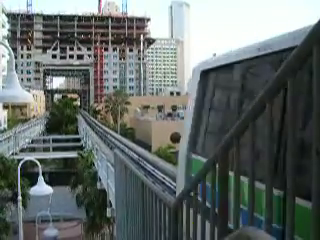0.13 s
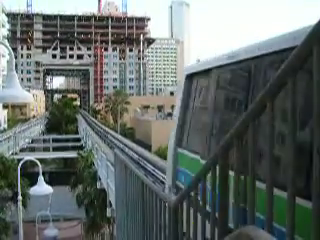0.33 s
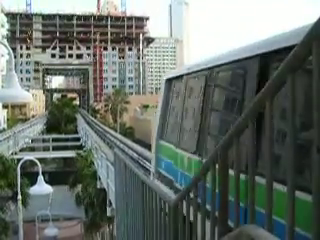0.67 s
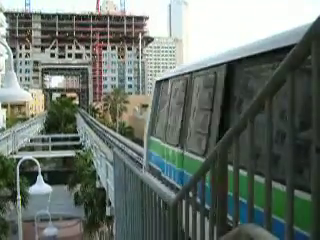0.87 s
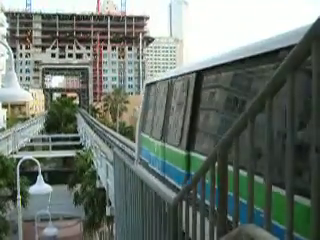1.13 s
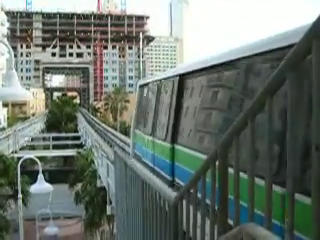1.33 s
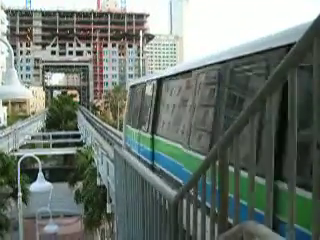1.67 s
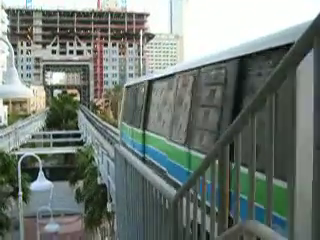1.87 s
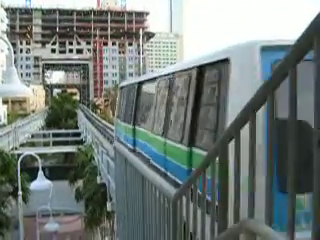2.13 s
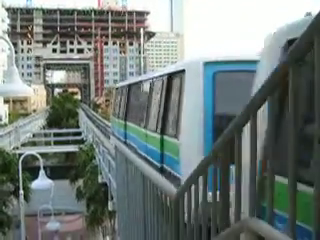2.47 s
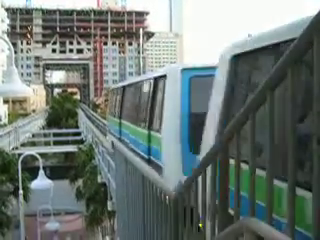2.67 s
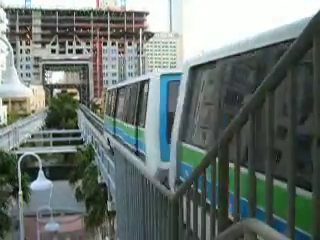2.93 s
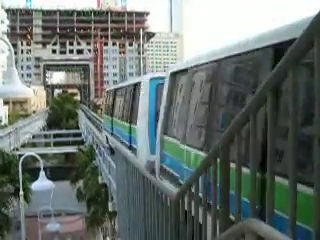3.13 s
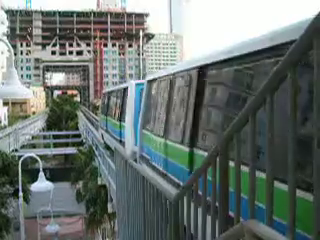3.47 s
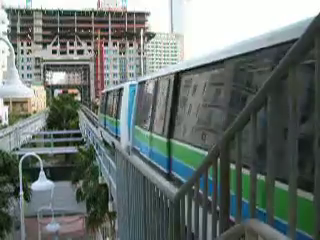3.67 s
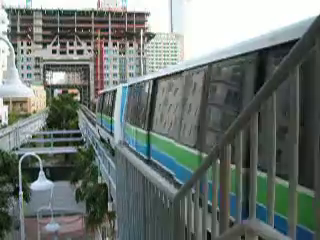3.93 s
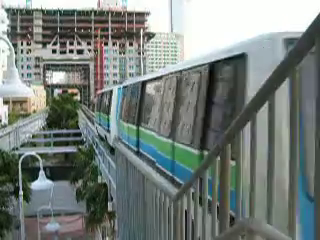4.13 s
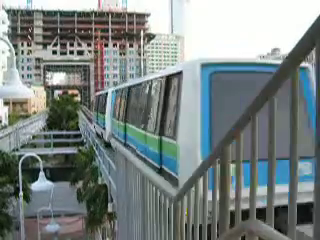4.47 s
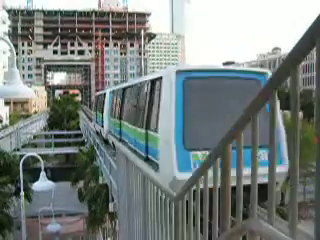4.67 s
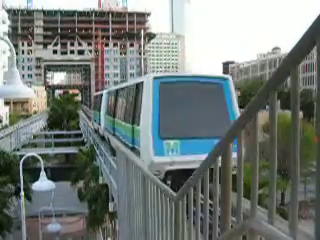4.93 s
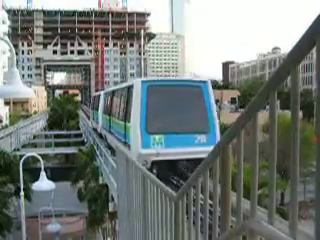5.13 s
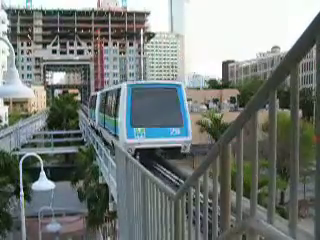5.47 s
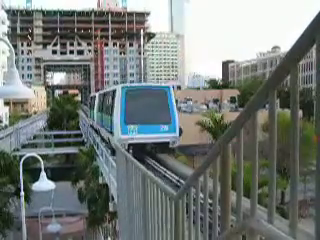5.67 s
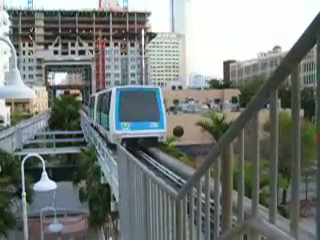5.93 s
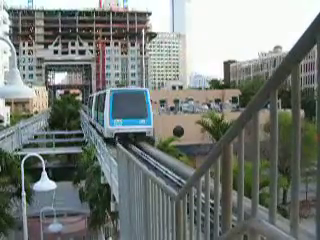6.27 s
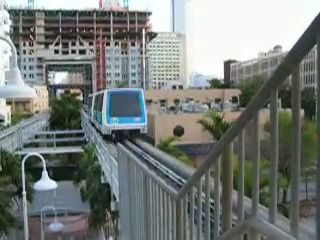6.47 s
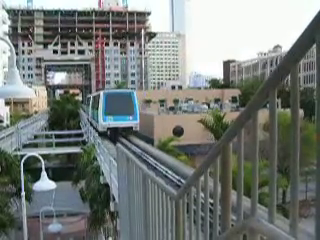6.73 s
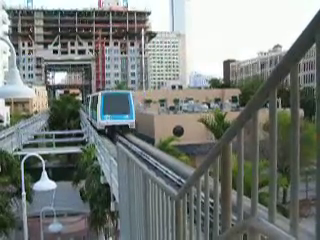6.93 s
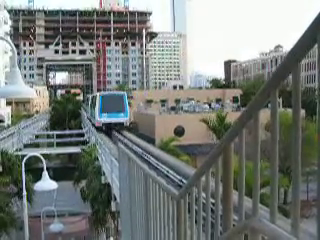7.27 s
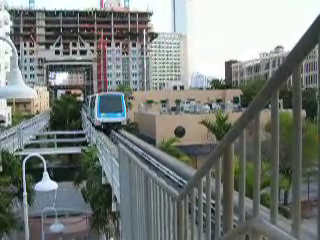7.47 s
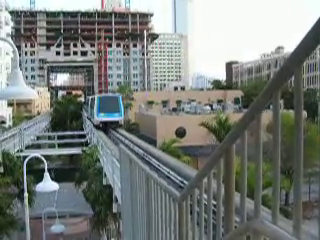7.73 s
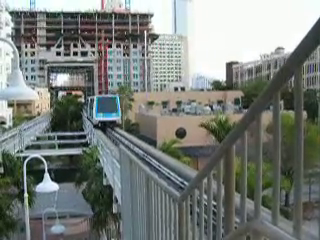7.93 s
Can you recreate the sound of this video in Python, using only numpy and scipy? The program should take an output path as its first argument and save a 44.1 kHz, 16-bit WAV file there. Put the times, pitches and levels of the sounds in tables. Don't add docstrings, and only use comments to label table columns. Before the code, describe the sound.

An elevated rubber-tyred train rumbles and roars past close by, metal shoes clanking on rail joints, caught by a small, overloaded, muffled microphone.

```python
import sys
import numpy as np
from scipy import signal
from scipy.fft import rfft, irfft
from scipy.io import wavfile
from scipy.ndimage import uniform_filter1d

SR = 44100
rng = np.random.default_rng(int(sys.argv[2]) if len(sys.argv) > 2 else 0)


def file_out(sig):
    cols = np.atleast_2d(sig).T
    lim = np.clip(cols, -1, 1)
    pcm = np.round(lim * 32767).astype(np.int16)
    wavfile.write(sys.argv[1], SR, pcm)


def ratio(d):
    e = np.asarray(d, float) / 20
    return 10 ** e


N = 357342
CEILING = .712


def evened(x):
    return x / np.sqrt(np.mean(x ** 2) + 1e-20)


def read(points, hz):
    f, value = np.transpose(points)
    return np.interp(np.log(hz + 1), np.log(f + 1), value, left=-100, right=-100)


def columns(rows):
    s, *values = np.transpose(rows)
    t = np.arange(N) / SR
    fade_s = .02
    gate = np.clip(np.minimum(t - s[0] + fade_s, s[-1] + fade_s - t) / fade_s, 0, 1)
    return gate, [np.interp(t, s, v) for v in values]


def drift(hz):
    z = rfft(rng.standard_normal(N))
    return evened(irfft(z / (1 + (np.fft.rfftfreq(N, 1 / SR) / hz) ** 2), N))


def noise(spectrum, patchy_db, flicker_db):
    frames, hz = N // 256 + 5, np.fft.rfftfreq(1024, 1 / SR)
    a, b, patches = rng.standard_normal((frames, 513, 3)).T
    patches = uniform_filter1d(patches, size=6, axis=0)
    patches = evened(uniform_filter1d(patches, size=14, axis=1))
    flicker = evened(uniform_filter1d(rng.standard_normal(frames), size=5))
    gain_db = read(spectrum, hz)[:, None] + patchy_db * patches + flicker_db * flicker
    z = (a + 1j * b) * ratio(gain_db)
    return evened(signal.istft(z, nperseg=1024, noverlap=768)[1][:N])


def tone(hz, db, waver_hz, flutter_db):
    turns = np.cumsum(hz + waver_hz * drift(12.13)) / SR
    level = np.sqrt(2) * ratio(db + flutter_db * drift(8))
    return level * np.sin(2 * np.pi * (turns + rng.random()))


def gated_tone(start_s, length_s, hz, glide_hz_per_s, peak_db, sink_db):
    t, switch_s = np.arange(N) / SR, 0.032
    gate = np.clip(np.minimum(t - start_s, start_s + length_s - t) / switch_s, 0, 1)
    arch_db = peak_db + sink_db * (2 * (t - start_s) / length_s - 1) ** 2 * (gate > 0)
    return gate * tone(hz + glide_hz_per_s * (t - start_s), arch_db, waver_hz=2.6, flutter_db=2.4)


def soft_limit(x, limit, order):
    return x / (1 + (x / limit) ** order) ** (1 / order)


def running():
    # (time [s], loudness [dB], upper layers over lower [dB])
    passing = [(0, -13.5, -2.5), (.3, -11.5, -1), (.55, -15.5, -1), (1.3, -13.5, 1.6), (1.72, -13.5, .5),
               (2.15, -14, 0.7), (2.55, -10.5, 0), (3.05, -13.5, .5), (3.9, -13, -0.2), (4.5, -13.5, 0.3),
               (5.3, -12, -0.4), (5.85, -13.5, 1), (6.1, -14.5, 0), (6.5, -12.5, -.5), (6.7, -15, -1.5),
               (7.25, -14.5, 0.5), (7.5, -11.5, -2.5), (8.1, -15.5, -0.9)]
    # (frequency [Hz], density [dB per Hz])
    rumble_spectrum = [(15, -58), (25, -28), (33, -47.5), (48, -51.5), (116, -13.5), (146, -3), (167, -1.5),
                       (264, 2.5), (313, -1), (450, -4.5), (580, -35.5), (990, -120)]
    roar_spectrum = [(200, -24.5), (280, -5), (400, -1.5), (600, -5), (850, -7.5), (1200, -32)]
    rush_spectrum = [(700, -19.5), (950, 1.5), (1300, -2.5), (1700, -4), (2100, -7.5), (2800, -38.5)]
    hiss_spectrum = [(1700, -33), (2250, 0), (2900, -1.5), (3500, -6.5), (3900, -17.5), (4250, -32.5),
                     (4600, -44.5), (4800, -81)]
    # (level re loudness [dB], share of brightness [1])
    layers = [(-4, -.6), (-3.5, -.1), (-7, .6), (-14.5, 1.1)]
    # (middle [s], length [s], upper layers [dB], lower layers [dB])
    openings = [(0.058, 0.059, -4, -5), (0.365, 0.05, -3.5, -8), (1.0, .15, 1.5, 1), (1.485, 0.15, 0, -1),
                (1.997, 0.29, -1, 0.5), (4.195, 0.22, 1.5, 2), (4.9, 0.42, 2.5, 0),
                (5.131, 0.067, -0.5, -2), (6.398, .2, 1, 2), (6.728, 0.077, 0.5, 1.5),
                (7.263, .06, -4.5, -3), (7.88, 0.13, -1.5, 0)]
    _, (loud_db, bright_db) = columns(passing)
    t = np.arange(N) / SR
    upper_db, lower_db = sum(np.outer(dbs, np.exp(-(2 * (t - s) / length_s) ** 2))
                             for s, length_s, *dbs in openings)
    rumble_db, roar_db, rush_db, hiss_db = (
        loud_db + db + share * bright_db + open_db
        for (db, share), open_db in zip(layers, (lower_db, lower_db, upper_db, upper_db)))
    rumble = ratio(rumble_db) * noise(rumble_spectrum, patchy_db=1.1, flicker_db=0.2)
    roar = ratio(roar_db) * noise(roar_spectrum, patchy_db=0.95, flicker_db=1.02)
    rush = ratio(rush_db) * noise(rush_spectrum, patchy_db=-0.14, flicker_db=0.98)
    hiss = ratio(hiss_db) * noise(hiss_spectrum, patchy_db=1.17, flicker_db=0.9)
    return rumble + roar + rush + hiss


def city_air():
    # (frequency [Hz], density [dB per Hz])
    air_spectrum = [(3000, -20), (3600, 0), (4000, 1), (4300, -6), (4700, -49)]
    return ratio(-55.5) * noise(air_spectrum, patchy_db=1.0, flicker_db=-0.2)


def hum():
    # (middle [s], length [s], peak [dB])
    bogies = [
        (.05, .7, -24),
        (.68, .5, -21),
        (1.3, .42, -19),
        (1.78, .22, -23),
        (2.75, .4, -30),
        (3.35, .6, -28),
        (4.45, .4, -27),
    ]
    t, mains_hz = np.arange(N) / SR, 60
    second = tone(2 * mains_hz, -32.5 - 0.3 * t, waver_hz=3.2, flutter_db=2.3)
    swell = ratio(-25 - 2.5 * t)
    for s, length_s, db in bogies:
        swell = swell + ratio(db) * np.exp(-(2 * (t - s) / length_s) ** 4)
    return second + swell * tone(3 * mains_hz, 0, waver_hz=1.8, flutter_db=2)


def gear_swells():
    # (start [s], length [s], frequency [Hz], glide [Hz per s], peak [dB])
    swells = [
        (.7, .45, 508, 35, -24),
        (1.75, .4, 680, 65, -25.5),
        (3.2, .35, 790, 40, -27),
        (4.3, 1.1, 459, 32, -21.5),
        (4.2, .6, 794, 30, -27),
        (4.8, .75, 828, 55, -32),
        (7.4, .5, 207, 22, -18.5),
        (7.05, .3, 448, 20, -24),
        (.15, .35, 250, 10, -21),
    ]
    return sum(gated_tone(*swell, sink_db=-14) for swell in swells)


def clanks():
    # (time [s], peak [dB], length [s], brightness [dB per octave])
    knocks = [(0.238, -9, 0.017, -4), (1.582, -9, 0.03, 13), (2.2707, -9, 0.047, 17.5),
              (2.677, -13, 0.024, 5), (3.266, -7, 0.035, -1), (3.3827, -8.5, 0.017, 1),
              (3.5494, -5, 0.038, -2), (3.6456, -6, 0.06, 0.5), (3.813, -8.5, 0.026, 3),
              (3.913, -6.5, 0.038, 15), (4.0823, -10.5, 0.046, 1.5), (4.248, -8, 0.037, 4.5),
              (4.339, -6, 0.021, -9), (4.511, -3.5, 0.016, -6), (4.602, -5, 0.03, 13),
              (4.79, -10.5, 0.014, 2.5), (4.872, -11.5, 0.036, 2), (5.2225, -3.5, 0.011, -1),
              (5.3056, -1, 0.043, -5), (5.75, -3.5, 0.065, 3), (5.8014, -9, 0.039, -2.5),
              (5.858, -13.5, 0.021, 11.5), (6.017, -5, 0.025, 8), (6.5964, -5.5, 0.019, -12.5),
              (6.67, -10.5, 0.026, 5), (6.8626, -2.5, 0.033, 3), (7.0385, -3.5, 0.047, -4),
              (7.139, -7.5, 0.041, -10), (7.4043, -3.5, 0.035, 0.5), (7.5984, -9.5, 0.027, -5)]
    # (frequency [Hz], width [Hz], level [dB])
    rail = [(1090, 100, -7), (1426, 82, -4), (1590, 63, 0.5), (1745, 45, 4), (1925, 250, 3.5),
            (2150, 290, -2), (2300, 160, -11), (2630, 65, -5), (3070, 310, -10)]
    out, t = np.zeros(N + SR), np.arange(SR // 4) / SR
    shifts = rng.uniform(-1, 1, (len(knocks), len(rail)))
    dull = signal.butter(8, 3400, fs=SR, output="sos")
    for (s, db, length_s, tilt_db), shift in zip(knocks, shifts):
        length_s = np.clip(length_s, .008, .1)
        blow, rattle = np.exp(-(t / length_s) ** 4), .45 * np.exp(-t / .08)
        scrape = rng.standard_normal(len(t)) * np.minimum(t / .0025, 1) * (blow + rattle)
        ring = 0
        for (hz, width_hz, mode_db), d in zip(rail, shift):
            r = np.exp(-np.pi * width_hz / SR)
            turn = 2 * np.pi * hz * (1 + .018 * d) / SR
            mode = signal.lfilter([np.sin(turn) * np.sqrt(1 - r)], [1, -2 * r * np.cos(turn), r * r], scrape)
            ring = ring + ratio(mode_db + tilt_db * np.log2(hz / 1745)) * mode
        ring = signal.sosfilt(dull, ring)
        rms = ring[:round(length_s * SR)].std()
        out[round(s * SR):][:len(t)] += ratio(db - 11.5) * ring / rms
    return out[:N]


def motor():
    # (time [s], first order [Hz])
    speed = [(.6, 160), (1.3, 180), (2.3, 211), (3.4, 256), (4.4, 292), (5.15, 318), (6.05, 346),
             (6.55, 372), (8.1, 402)]
    # (frequency [Hz], width [Hz], level [dB])
    beam = [(159, 2.7, -27.5), (194.2, 7, -23.5), (208.3, 9, -20), (248, 14, -22.5), (275.6, 13, -24.5),
            (288.5, 4.6, -21), (319.8, 10, -18.5), (331.9, 7, -22), (347.2, 7, -27), (367.9, 11, -22),
            (386, 3.4, -24.5), (389, 3.3, -23.5), (400, 4.3, -23.5)]
    # (frequency [Hz], width [Hz], level [dB])
    panels = [(354, 16, -23), (369, 10, -21), (421, 14, -21), (456, 12, -21), (478, 12, -17),
              (512, 14, -25), (562, 8, -21), (674, 20, -26), (715, 20, -29), (742, 16, -30)]
    gate, (first_hz,) = columns(speed)
    first_hz = uniform_filter1d(first_hz, size=SR // 4)
    out = 0
    for order, modes in ((1, beam), (2, panels)):
        hz = order * first_hz
        gain = ratio(-41.5)
        for mode_hz, width_hz, db in modes:
            gain = gain + ratio(db) * np.exp(-2 * ((hz - mode_hz) / width_hz) ** 2)
        out = out + gain * tone(hz, 0, waver_hz=4.5, flutter_db=3)
    return gate * out


def converter_whines():
    # (start [s], length [s], frequency [Hz], glide [Hz per s], level [dB])
    high = [
        (.6, 1.15, 2494, -5, -33.5),
        (1.75, .68, 2486, 5, -37),
        (2.55, .55, 2493, -5, -34),
    ]
    plain = [
        (6.74, .86, 996, 0, -24),
        (7.67, .17, 998, 0, -25),
        (7.84, .3, 1005, 30, -35),
        (7.6, .55, 1546, 0, -35),
        (7.6, .55, 2645, 200, -44),
        (.72, 1.05, 2540, -8, -36.5),
    ]
    # (offset [Hz], level [dB])
    flanks = [(-37.5, -5), (21, -5)]
    out = sum(gated_tone(*whine, sink_db=0) for whine in plain)
    for s, length_s, hz, glide, db in high:
        for offset_hz, rel_db in [(0, 0), *flanks]:
            out = out + gated_tone(s, length_s, hz + offset_hz, glide, db + rel_db, sink_db=0)
    return out


def squeaks():
    # (time [s], frequency [Hz], length [s], rms [dB])
    chirps = [
        (7.022, 3494, 0.031, -32.5),
        (7.137, 3540, 0.035, -32),
    ]
    out = np.zeros(N)
    for s, hz, length_s, db in chirps:
        t = np.arange(round(length_s * SR)) / SR
        sine = np.sqrt(2) * ratio(db) * np.sin(2 * np.pi * hz * t)
        out[round(s * SR):][:len(t)] += sine * signal.windows.tukey(len(t), .4)
    return out


def scene():
    train = running() + hum() + gear_swells() + clanks() + motor() + converter_whines() + squeaks()
    return (train + city_air())[None]


def gain_control(x):
    peak_db = 20 * np.log10(abs(x) + 1e-9)
    rise_db = np.arange(N) * 12.0 / SR
    held_db = np.maximum.accumulate(peak_db + rise_db) - rise_db
    over_db = np.maximum(held_db + 7.0, 0)
    return x / ratio(0.3 * uniform_filter1d(over_db, size=60, origin=29))


def overshoot(x):
    # (time [s], crackle [dB])
    overloads = [(0.0213, -36.5), (0.2616, -33.5), (0.3333, -35), (1.1945, -38), (1.3833, -43),
                 (1.4316, -38), (1.8429, -42), (2.3286, -36.5), (2.5062, -40.5), (2.5612, -40.5),
                 (2.6155, -36), (3.2885, -45.5), (3.3959, -37.5), (3.548, -33), (3.778, -39.5),
                 (4.2725, -39.5), (4.371, -39.5), (4.6193, -37.5), (4.7785, -42), (4.805, -36.5),
                 (4.8737, -35.5), (5.216, -30.5), (5.2378, -41), (5.3348, -35), (5.448, -37.5),
                 (5.89, -46.5), (6.0472, -34), (6.545, -40), (6.7802, -33), (6.8746, -35)]
    grazes = [.4887, .8452, 1.3075, 3.717, 4.0984, 4.4934, 4.5251, 4.5994, 4.8339, 5.0764, 5.3188, 5.8192,
              6.1799, 6.325, 6.4697, 7.227, 7.432, 7.7508]
    out, t = x.copy(), np.arange(-300, 301)
    narrow, wide = np.exp(-.5 * (t / 24) ** 2), np.exp(-.5 * (t / 80) ** 2)
    for s, db in list(overloads) + [(s, -48.5) for s in grazes]:
        first = round(s * SR)
        crest = first + np.argmax(abs(out[first - 50:first + 150])) - 50
        extra = out[crest + t] * narrow
        extra = extra - wide * extra.sum() / wide.sum()
        missing = max(CEILING + ratio(db + 10.0) - abs(out[crest]), 0)
        out[crest + t] += extra * missing / abs(extra[len(t) // 2])
    return out


def glitch():
    # (time [s], level [dB])
    tick = (8.021, -16.5)
    return ratio(tick[1]) * np.exp(-.5 * (np.arange(N) - round(tick[0] * SR)) ** 2.)


def top_cut(x):
    return signal.sosfilt(signal.butter(12, 15870, fs=SR, output="sos"), x)


def record(dry):
    rounded = soft_limit(gain_control(dry[0]) - .038, .64, 8)
    lowpass = signal.firwin(301, 4350, window=("kaiser", 11), fs=SR)
    narrow = signal.oaconvolve(rounded, lowpass, "same")
    narrow = soft_limit(narrow, 1.05, 8)
    fade_in = np.minimum(np.arange(N) / 30, 1)
    loud = (overshoot(narrow) + glitch()) * fade_in
    clipped = soft_limit(loud, CEILING, 120)
    return top_cut(clipped[None])


dry = scene()
out = record(dry)
file_out(out)
```